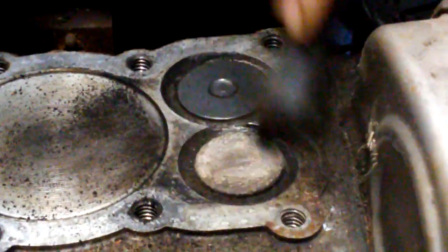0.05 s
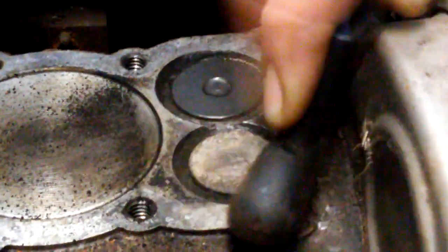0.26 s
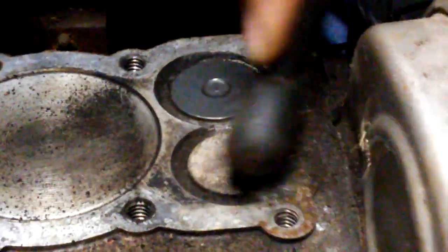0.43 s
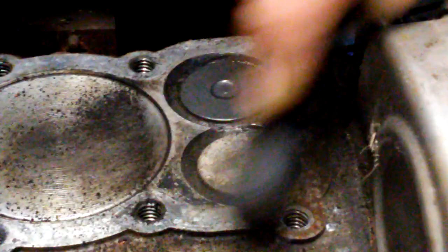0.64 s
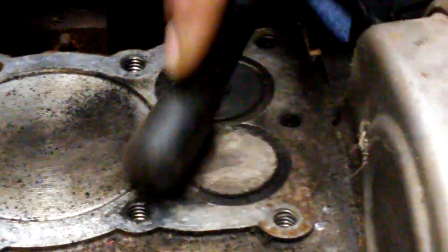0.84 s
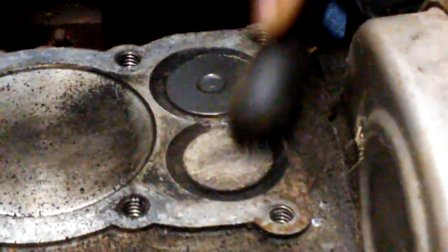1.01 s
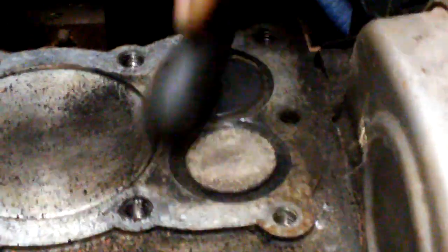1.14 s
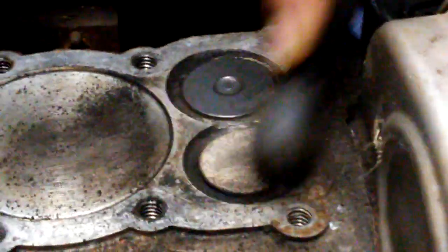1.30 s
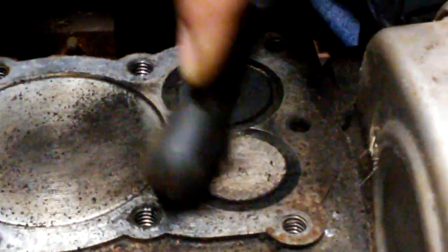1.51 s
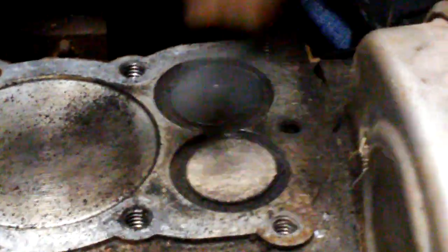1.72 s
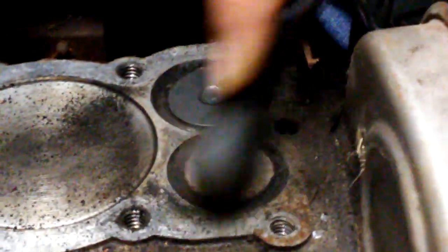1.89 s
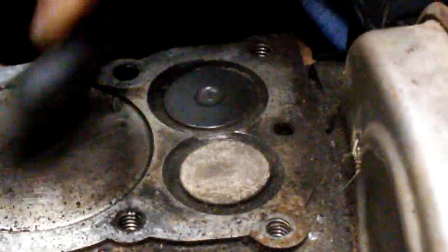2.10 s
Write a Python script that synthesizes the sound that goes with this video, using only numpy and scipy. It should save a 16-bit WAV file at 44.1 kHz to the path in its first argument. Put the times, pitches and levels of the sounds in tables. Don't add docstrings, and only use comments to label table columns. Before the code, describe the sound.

Wire brush scratches carbon off an engine's valves and metal in fast uneven strokes, one sharp clatter

```python
import sys
import numpy as np
from scipy import signal
from scipy.io import wavfile
from scipy.ndimage import uniform_filter1d

SR = 44100
rng = np.random.default_rng(int(sys.argv[2]) if len(sys.argv) > 2 else 0)


def undo_db(level):
    steps = np.asarray(level, float) / 20
    return 10 ** steps


def int16_out(signal):
    q = np.round(np.clip(np.atleast_2d(signal).T, -1, 1) * 32767)
    wavfile.write(sys.argv[1], SR, q.astype(np.int16))


N = 94815
T = np.arange(N) / SR

# (full speed reached [s], held for [ms], level [dB],
# run-up [ms per 20 dB], slow-down [ms per 20 dB])
STROKES = [(0.0, 1, -55.5, 9, 57), (0.06, 4.5, -52, 74, 81), (0.124, 29, -57, 53, 46),
           (0.197, 44, -53, 48, 24), (0.277, 70, -59.5, 34, 78), (0.445, 40.5, -60.5, 28, 58.5),
           (0.56, 13, -80, 10, 35.5), (0.604, 61.5, -66.5, 38.5, 54), (0.751, 56.5, -64.5, 7, 34),
           (0.923, 33.5, -60.5, 26.5, 149), (1.04, -7.5, -58.5, 15, 86), (1.108, 2, -63, 20, 93),
           (1.166, 4, -59.5, 14, 34), (1.243, 36.5, -58.5, 79, 60), (1.385, 23, -60.5, 14.5, 54),
           (1.433, 36.5, -68.5, 14, 52), (1.553, 51.5, -56.5, 41, 60.5), (1.679, 9.5, -59.5, 23, 104),
           (1.727, 22, -64, 82, 103), (1.792, 17, -61.5, 20, 25), (1.859, 35.5, -58.5, 41, 61),
           (2.122, 8.5, -58.5, 49, 57)]
# (time [s], level [dB])
VALVE_FREEDOM = [(0, 12.5), (.035, 8.5), (.06, 0.5), (.15, 4.5), (.2, 0.5), (.45, 1), (.62, 0), (.78, -3.5),
                 (.95, 3.5), (1.04, -1.5), (1.2, 1.5), (1.4, -3), (1.56, 3), (1.7, -2.5), (1.78, 2.5),
                 (1.88, 1.5), (2.15, 0.5)]
# (frequency [Hz], width [Hz], level [dB])
VALVE_MODES = [(1990, 110, -5), (2974, 110, -0.5), (3145, 100, -1.5), (3472, 150, -4)]
# (frequency [Hz], width [Hz], level [dB])
CASTING_MODES = [(159, 32, -7), (210, 43, -12), (1198, 58, -6.5), (4110, 240, -7), (5460, 220, -8),
                 (6164, 160, -6), (6830, 200, -3.5), (7376, 400, -4.5)]
# (frequency [Hz], level [dB per Hz])
SCRATCH_TONE = [(40, -11.5), (120, 0.5), (700, -2.5), (2500, -7.5), (4800, -11), (6500, 1.5), (9000, -2),
                (15700, -0.5)]
# (frequency [Hz], level [dB per Hz])
HUSH_TONE = [(25, -14.5), (45, -5), (110, 5.5), (300, -0.5), (700, -11.5), (3000, -22), (15500, -24)]
# (time [s], level [dB])
KNOCK_CONTACTS = [
    (0.2169, -23.5),
    (0.2198, -23.5),
    (0.2236, -28),
    (0.2276, -30.5),
    (.243, -39),
]
# (frequency [Hz], level [dB], time to fall 60 dB [s])
PART_MODES = [(203.8, -7.5, .33), (276, -13.5, .25), (326, -2.5, 0.078), (484.7, -13.5, .22),
              (546.4, -5, .09), (691, -10.5, 0.13), (857.4, -7, 0.045), (1190, -6.5, 0.1735),
              (1820, -12, .15), (2003, -3, 0.081), (2432, -7.5, 0.062), (2488, -2, 0.097),
              (2958, -12, 0.13), (3444, -11, 0.063)]
# (frequency [Hz], level [dB per Hz])
CLATTER_TONE = [(130, -28), (250, 4), (600, -2), (900, -8.5), (2200, 1.5), (3500, -5.5), (5000, -13.5),
                (12000, -33)]
# (frequency [Hz], time to fall 60 dB [s])
CLATTER_FADE = [(200, 0.35), (1000, 0.29), (3000, 0.29), (6000, 0.067), (12000, 0.048)]

TIPS_PER_S, TIP_SPREAD_DB = 11000, 1.5
FLUTTER_DB, FLUTTER_PER_S = 0.5, 93
WANDER_DB, WANDER_PER_S = 3.5, 13
SCRATCH_DB, VALVE_DB, CASTING_DB = -0.5, -2.5, -1.5
CLATTER_DB, CRACK_DB, CRACK_FADE_S = -30.5, -26.5, 0.048
SKID_S, SKID_DB, SKID_HZ, SKID_WIDTH_HZ = 0.008, -40, 3000, 930
PART_LOW_HZ = 175
HUSH_DB = -89
MICROPHONE_TOP_HZ = 15750


def rms_one(x):
    return x / np.sqrt(np.mean(x ** 2) + 1e-20)


def at_hz(points, hz):
    table = np.array(points)
    return np.interp(np.log(hz), np.log(table[:, 0]), table[:, 1])


def drift(rate):
    r = np.exp(-2 * np.pi * rate / SR)
    noise = rng.standard_normal(N + SR)
    return rms_one(signal.lfilter([1], [1, -2 * r, r * r], noise)[SR:])


def resonate(x, hz, width_hz):
    r = np.exp(-np.pi * width_hz / SR)
    feedback = [1, -2 * r * np.cos(2 * np.pi * hz / SR), r * r]
    return signal.lfilter([(1 - r * r) / 2, 0, (r * r - 1) / 2], feedback, x)


def bank(sources, gain):
    edges = 22 * 2 ** np.arange(0, 9.9, 1 / 3)
    out = 0
    for k, (low, high) in enumerate(zip(edges, edges[1:])):
        band = signal.butter(2, [low, high], "band", fs=SR, output="sos")
        out = out + gain(np.sqrt(low * high)) * signal.sosfilt(band, sources[k % 2])
    return out


def bristle_tips():
    size_db = TIP_SPREAD_DB * np.minimum(rng.exponential(1, N), 5)
    snaps = undo_db(size_db) * rng.choice([-1, 1], N)
    return rms_one(snaps * (rng.random(N) < TIPS_PER_S / SR))


def stroke_force():
    power = np.zeros(N)
    for start, hold, db, up, down in STROKES:
        before_ms = 1e3 * np.maximum(start - T, 0)
        after_ms = np.maximum(1e3 * (T - start) - hold, 0)
        level_db = db - 20 * before_ms / max(up, 4) - 20 * after_ms / max(down, 4)
        power += undo_db(level_db) ** 2
    smooth = uniform_filter1d(power, size=220).clip(0)
    return np.sqrt(smooth) * undo_db(FLUTTER_DB * drift(FLUTTER_PER_S))


def ring_body(x, modes):
    out = np.zeros(N)
    for k, (hz, width_hz, db) in enumerate(modes):
        push = x * undo_db(WANDER_DB * drift(WANDER_PER_S))
        out += (-1) ** k * undo_db(db) * resonate(push, hz, width_hz)
    return out


def brush():
    force = stroke_force()
    valve_tips, casting_tips = bristle_tips(), bristle_tips()
    freedom = undo_db(np.interp(T, *np.transpose(VALVE_FREEDOM)))
    scratch = rms_one(bank([valve_tips, casting_tips], lambda hz: undo_db(at_hz(SCRATCH_TONE, hz))))
    valve = ring_body(valve_tips * force * freedom, VALVE_MODES)
    valve /= np.std(ring_body(valve_tips, VALVE_MODES))
    casting = ring_body(casting_tips * force, CASTING_MODES)
    casting /= np.std(ring_body(casting_tips, CASTING_MODES))
    return undo_db(SCRATCH_DB) * force * scratch + undo_db(VALVE_DB) * valve + undo_db(CASTING_DB) * casting


def hush():
    noise = rng.standard_normal((2, N))
    return undo_db(HUSH_DB) * rms_one(bank(noise, lambda hz: undo_db(at_hz(HUSH_TONE, hz))))


def part_ring(times, levels_db):
    out = np.zeros(N)
    luck_db = rng.normal(0, 1.9, (len(PART_MODES), len(times)))
    for (hz, mode_db, fade_s), own_db in zip(PART_MODES, luck_db):
        clicks = np.full(N, 1e-18)
        clicks[(times * SR).astype(int)] = undo_db(levels_db + mode_db + own_db)
        r, w = undo_db(-60 / (fade_s * SR)), 2 * np.pi * hz / SR
        out += signal.lfilter([0, np.sin(w)], [1, -2 * r * np.cos(w), r * r], clicks)
    return out


def clatter(age, noise):
    def dying(fade_s):
        return (age > 0) * undo_db(-60 * age.clip(0) / fade_s)

    def tone(hz):
        return undo_db(at_hz(CLATTER_TONE, hz))

    unit = np.std(bank(noise, tone))

    def gain(hz):
        tail = undo_db(CLATTER_DB) * dying(at_hz(CLATTER_FADE, hz))
        crack = undo_db(CRACK_DB) * dying(CRACK_FADE_S)
        return tone(hz) / unit * (tail + crack)

    return bank(noise * (age > 0), gain)


def knock():
    times, levels_db = np.transpose(KNOCK_CONTACTS)
    age = T - times[0]
    noise = rng.standard_normal((3, N))
    struck = part_ring(times, levels_db) + clatter(age, noise[:2])
    low_cut = signal.butter(6, PART_LOW_HZ, "high", fs=SR, output="sos")
    skid = noise[2] * (age > -SKID_S) * (age < 0)
    skid = undo_db(SKID_DB + 10) * resonate(skid, SKID_HZ, SKID_WIDTH_HZ)
    return signal.sosfilt(low_cut, struck) + skid


def scene():
    return (brush() + hush() + knock())[None]


def band_limit(x):
    return signal.sosfilt(signal.butter(12, 16690, fs=SR, output="sos"), x)


def record(dry):
    top_cut = signal.ellip(12, 0.5, 70, MICROPHONE_TOP_HZ, fs=SR, output="sos")
    mix = signal.sosfilt(top_cut, dry)
    return band_limit(mix)


dry = scene()
out = record(dry)
int16_out(out)
```